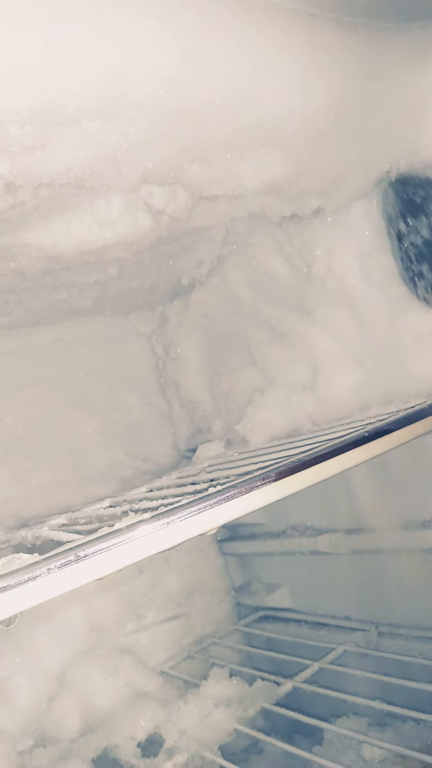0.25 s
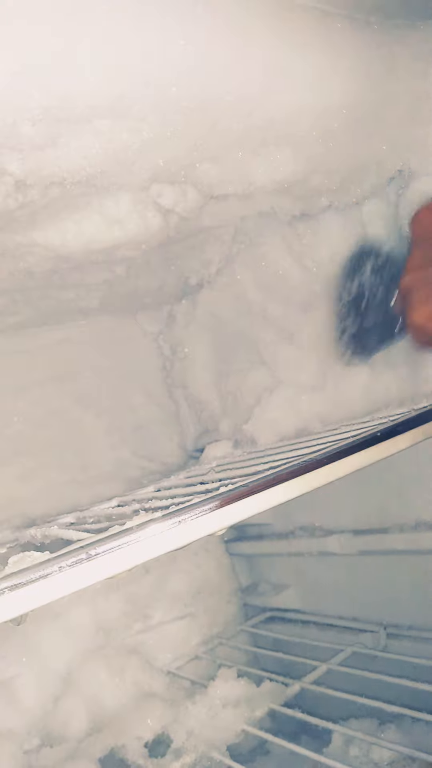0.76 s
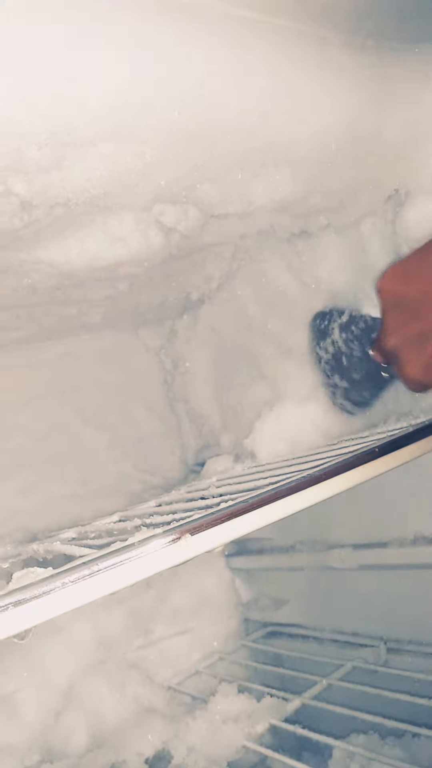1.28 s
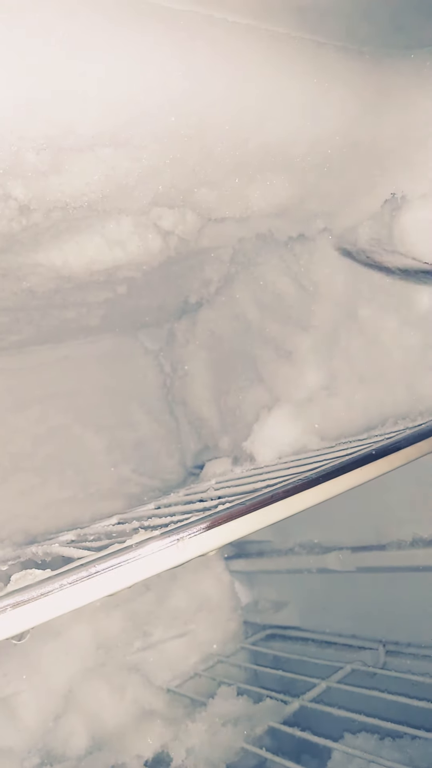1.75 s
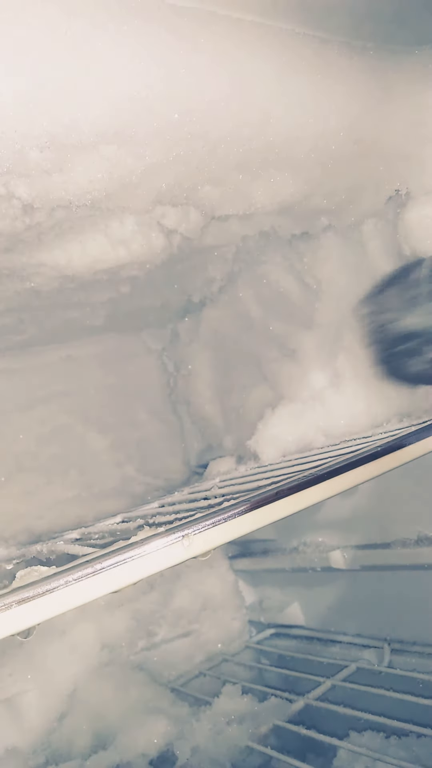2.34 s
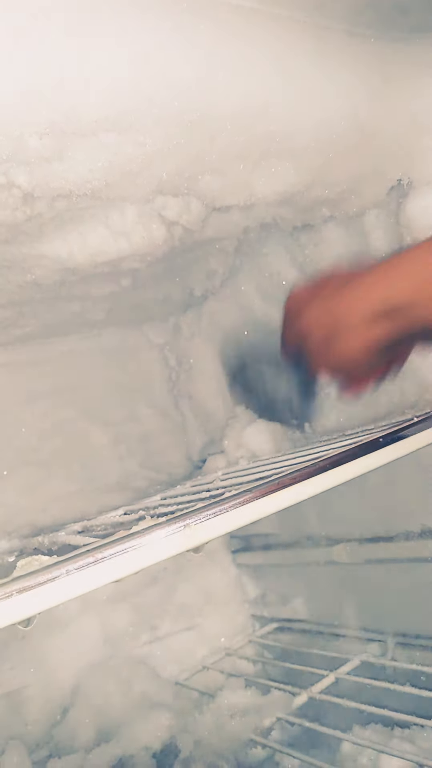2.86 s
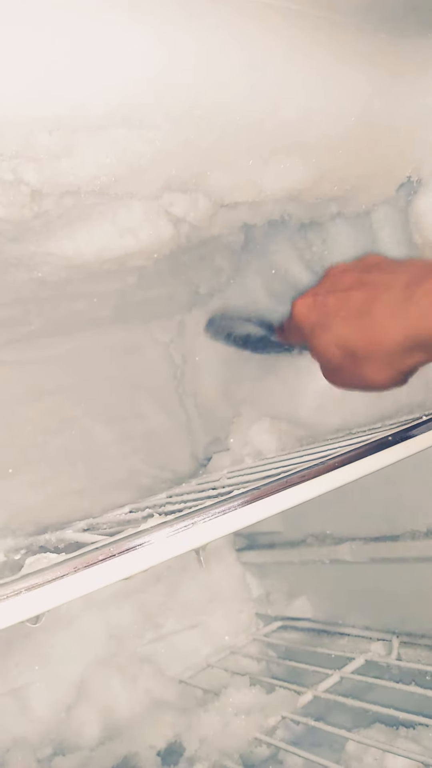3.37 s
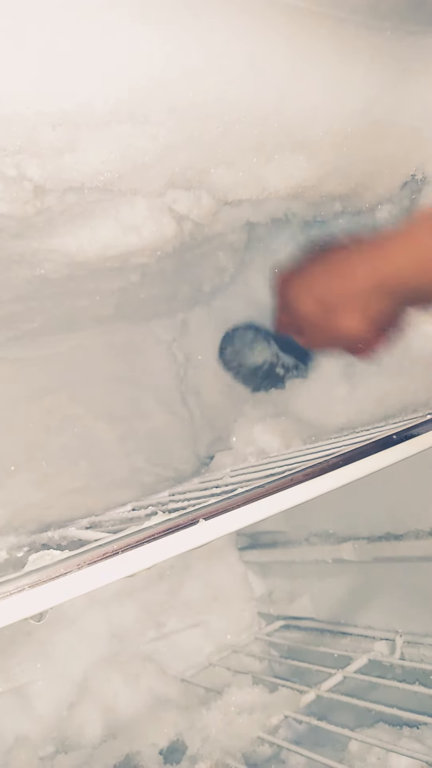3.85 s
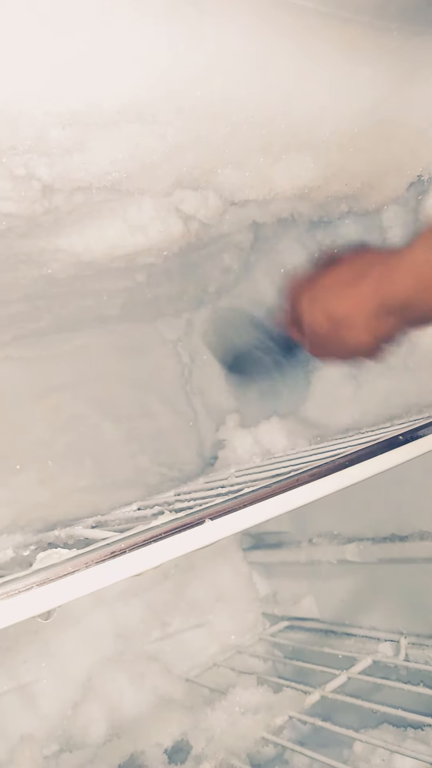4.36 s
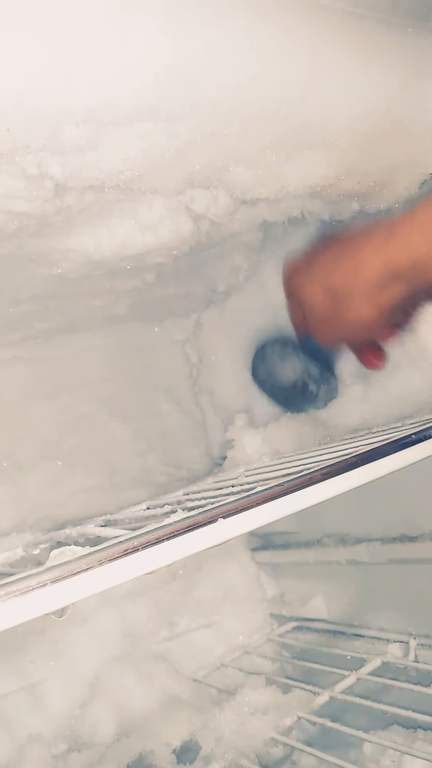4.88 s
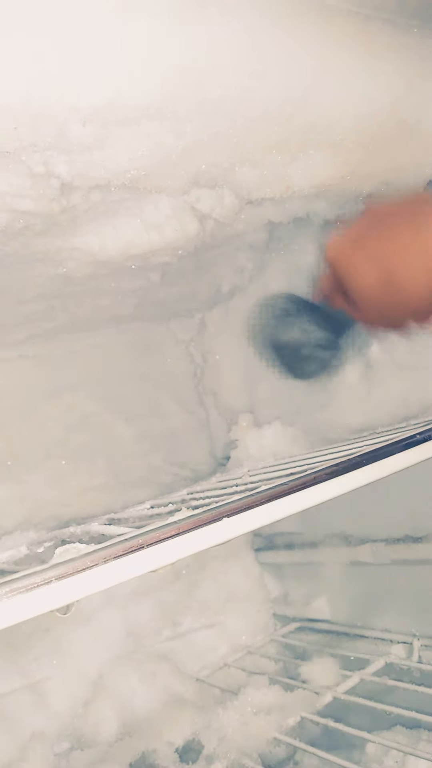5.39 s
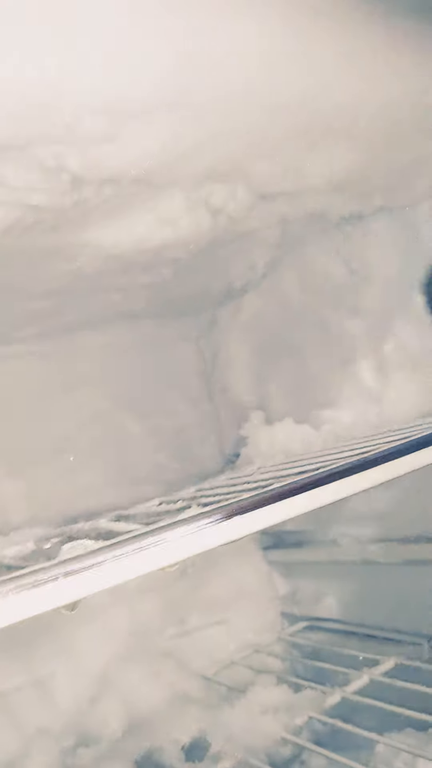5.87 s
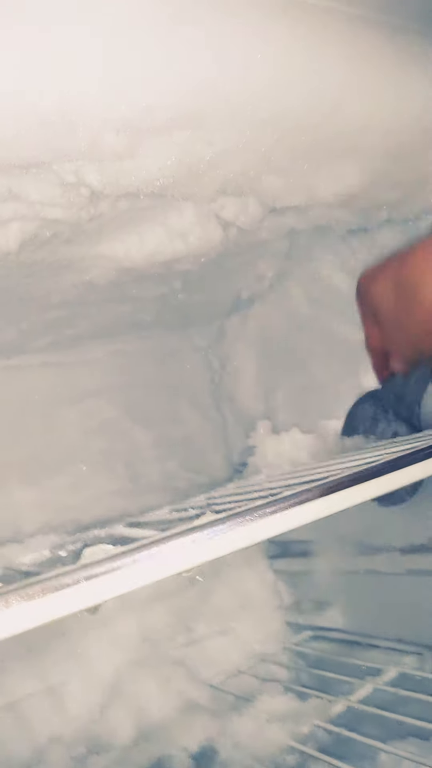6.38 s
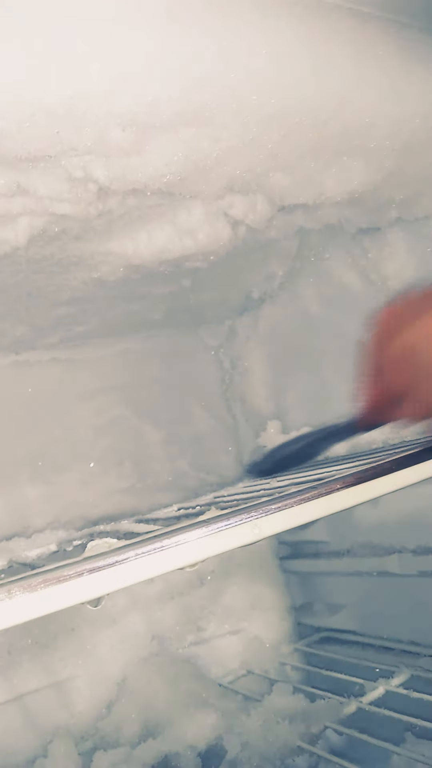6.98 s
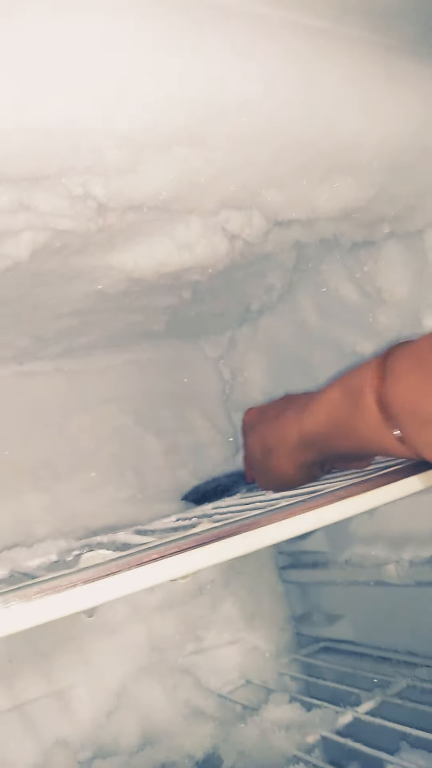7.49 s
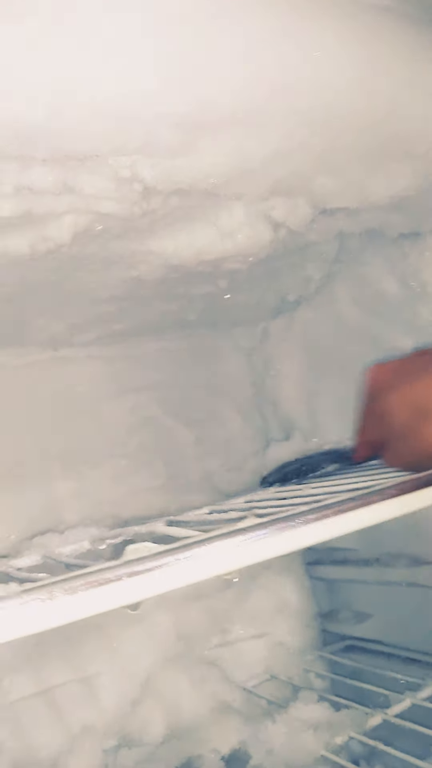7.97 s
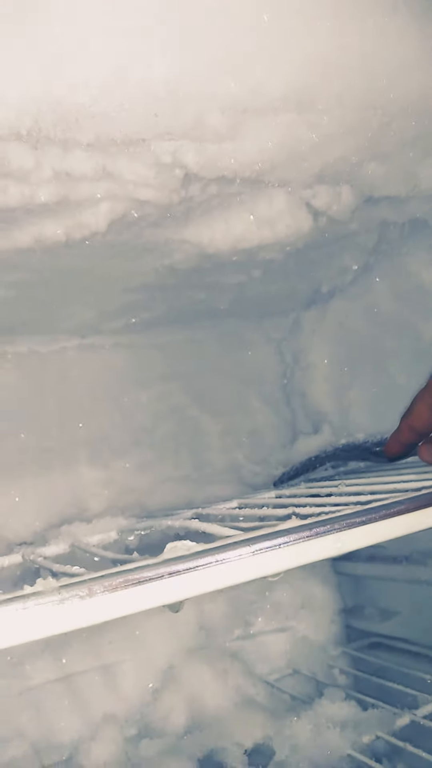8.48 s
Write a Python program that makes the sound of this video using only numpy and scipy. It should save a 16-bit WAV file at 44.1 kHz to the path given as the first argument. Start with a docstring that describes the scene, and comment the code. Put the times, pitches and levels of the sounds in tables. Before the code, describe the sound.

A hand scraper rasps thick frost from a freezer wall, then a scoop stabs it with crunchy thuds over a low motor hum.

```python
"""A flat scraper rasps thick frost from a freezer wall over a low hum, then a scoop scrapes and stabs at it.
Breaking ice is random snaps over powder noise, heard as hiss, as rattle of the tool and as boom of the liner.
Each stab is pulled back through loose frost, crumbs trickle after the work, and hard ticks mark chips and
short glancing stabs. At the end the scoop knocks along the wire shelf.
The small cabinet adds a brief, diffuse ring."""
import sys
import numpy as np
from scipy import signal
from scipy.fft import rfft, irfft, next_fast_len
from scipy.io import wavfile
from scipy.ndimage import uniform_filter1d, map_coordinates

SR = 44100
rng = np.random.default_rng(int(sys.argv[2]) if len(sys.argv) > 2 else 0)


def put_to_file(sound):
    """Save the sound as 16-bit audio at rate SR, in the file named by the first command-line argument."""
    columns = np.atleast_2d(sound).T  # one column per channel
    safe = np.clip(columns, -1, 1)
    whole_steps = np.round(safe * 32767)
    wavfile.write(sys.argv[1], SR, whole_steps.astype(np.int16))


N = 385409


def amp(db):
    """Decibels to gain."""
    return 10 ** (np.asarray(db) / 20)


def unit(x):
    """Scale to rms 1."""
    return x / np.sqrt(np.mean(x ** 2) + 1e-20)


def along(points, hz):
    """Read a list of (frequency, value) points on a log frequency axis."""
    f, v = np.transpose(points)
    return np.interp(np.log(hz + 1), np.log(f + 1), v)


def wobble(rate):
    """A smooth random curve with this many knots a second."""
    knots = rng.standard_normal(int(N * rate / SR) + 4)
    coarse = np.arange(0, N, 16)
    smooth = map_coordinates(knots, [coarse * rate / SR])
    return np.interp(np.arange(N), coarse, smooth)


def filtered(x, response):
    """Multiply the spectrum of x by a function of frequency."""
    m = next_fast_len(N + SR // 2)
    hz = np.fft.rfftfreq(m, 1 / SR)
    return irfft(rfft(x, m) * response(hz), m)[..., :N]


def ring(force, response):
    """Play a force through an impulse response."""
    return signal.oaconvolve(force, response)[:N]


def add(track, s, piece):
    """Mix a piece into a track at time s, in seconds."""
    part = track[..., max(round(s * SR), 0):][..., :piece.shape[-1]]
    part += piece[..., :part.shape[-1]]


# tones of the motor hum, against each other: (f/Hz, level/dB)
HUM_TONES = [(57, 1.5), (70, 1.5), (113, -12), (280, -11.5), (452, -29.5)]
# the hum swells and fades, before HUM_DB is added: (t/s, level/dB)
HUM_SWELL = [(0.1, -61), (1.35, -57.5), (2.16, -50), (3.63, -57.5), (4.57, -54), (5.42, -66), (6.49, -54),
             (8.6, -58)]
# colour of the dull room noise: (f/Hz, level/dB per Hz)
ROOM_COLOUR = [(18, -70), (30, -22), (55, -12), (81, -19), (113, -1.5), (151, -28.5), (367, -25.5),
               (420, -13), (535, -33), (639, -21), (1220, -17.5), (1360, -21), (2100, -20.5), (3020, -43.5),
               (6000, -64), (7800, -75.5), (13200, -120)]
# colour of the faint steady hiss: (f/Hz, level/dB per Hz)
HISS_COLOUR = [(3000, -29.5), (6400, -22), (7000, -1.5), (7600, 2.5), (8300, -21), (14000, -24)]
HUM_DB = -5


def background():
    """A motor hum of tones with wavering phase, over dull room noise and a thin hiss, both filtered noise."""
    t = np.arange(N) / SR
    hum = sum(amp(db) * unit(np.sin(2 * np.pi * hz * t + 0.8 * wobble(6.8))) for hz, db in HUM_TONES)
    hum_level = amp(HUM_DB + np.interp(t, *np.transpose(HUM_SWELL)))

    def noise(colour):
        return unit(filtered(rng.standard_normal(N), lambda hz: amp(along(colour, hz))))

    return hum_level * hum + amp(-56.5) * noise(ROOM_COLOUR) + amp(-70.5) * noise(HISS_COLOUR)


# how long the cabinet takes to fade by 60 dB: (f/Hz, fade time/s)
CABINET_FADE = [(100, 0.22), (400, 0.34), (1500, 0.24), (5000, 0.032), (13000, 0.27)]


def cabinet(x):
    """The frosted box answers with a short diffuse tail: noise that fades at its own pace at each frequency."""
    hz, t, z = signal.stft(rng.standard_normal(SR // 3), SR, nperseg=256)
    fade = amp(-60 * t / along(CABINET_FADE, hz)[:, None])
    tail = signal.istft(z * fade, SR, nperseg=256)[1]
    delayed = np.pad(tail, (SR // 300, 0))
    return ring(x, delayed / np.linalg.norm(tail))


def fractures(rate, spread_db, powder):
    """Force of rms 1 from breaking crystals: random snaps of uneven size over fine powder noise."""
    happens = rng.random(N) < rate / SR
    sign = rng.choice([-1, 1], N)
    size = amp(spread_db * np.clip(rng.standard_normal(N), -2, 2))
    return unit(unit(happens * sign * size) + powder * rng.standard_normal(N))


# the rasp of the edge, set by where it touches the wall: (t/s, f/Hz)
RASP = [(0.0, 2130), (0.15, 1800), (2.45, 1640), (2.69, 2000), (4.87, 1810), (5.33, 1520), (5.4, 2120),
        (6.77, 2010), (7.03, 1720), (7.13, 2390), (7.3, 1620), (7.6, 2380)]


def shifting(force, patchy_db, rasp_db=0, rasp_width_hz=300):
    """Every flake breaks with its own colour, and the edge favours its rasp frequency."""
    hz, t, z = signal.stft(force, SR, nperseg=512)
    field = uniform_filter1d(rng.standard_normal(z.shape), size=3, axis=0)
    field = uniform_filter1d(field, size=5, axis=1)
    flakes = unit(amp(patchy_db * unit(field)))
    offset_hz = hz[:, None] - np.interp(t, *np.transpose(RASP))
    rasp = 1 / (1 + (2 * offset_hz / rasp_width_hz) ** 2)
    # the constant cuts the rest while the rasp is lifted
    return signal.istft(z * flakes * amp(rasp_db * (rasp - 0.4722)), SR, nperseg=512)[1][:N]


# narrow peaks and dips in the rattle and crackle: (f/Hz, width/Hz, lift/dB)
NARROW_PEAKS = [(1352, 13.3, 5.5), (1630, 15, 8.5), (1944, 13, 0.5), (4545, 140, 7.5), (5886, 320, 6),
                (8100, 32, 5), (8300, 65, -2.5), (10600, 87, 5), (11130, 91, 6.5), (12570, 58, -4.5)]


def body(spectrum, size=2048):
    """Causal impulse response of energy 1 with this spectrum and the narrow peaks."""
    f = np.fft.rfftfreq(size, 1 / SR)
    peaks = sum(lift / (1 + (2 * (f - hz) / width) ** 2) for hz, width, lift in NARROW_PEAKS)
    cepstrum = irfft(np.log(amp(along(spectrum, f) + peaks) + 1e-6))
    # folding the cepstrum moves the energy to the start of the response
    cepstrum[1:size // 2] *= 2
    cepstrum[size // 2 + 1:] = 0
    h = irfft(np.exp(rfft(cepstrum)))
    return h / np.linalg.norm(h)


# the band that the frosted liner radiates
FROST_COAT = signal.butter(N=3, Wn=[90, 900], btype="band", fs=SR, output="sos")


def panel(modes, size=8192):
    """Impulse response of energy 1 of a resonant panel whose frost coat damps the treble."""
    f = np.fft.rfftfreq(size, 1 / SR)
    modal = sum(amp(db) * 1j * f * w / (c * c - f * f + 1j * f * w) for c, w, db in modes)
    h = signal.sosfilt(FROST_COAT, irfft(modal))
    return h / np.linalg.norm(h)


def crunch(drive, forces, liner, tool, ice):
    """Fractures shake the liner and the tool, and crackle in the air: three rows."""
    responses = (panel(liner), body(tool), body(ice))
    return np.array([ring(force, h) for force, h in zip(drive * forces, responses)])


# the liner's resonances under the scraper, the scoop and the shelf: (f/Hz, width/Hz, level/dB)
LINER_SCRAPER = [(109, 26, -4), (181, 150, -15.5), (311, 36, -3.5), (434, 23, 1.5), (580, 51, -14)]
LINER_SCOOP = [(114.7, 8, -9), (190.4, 97, -7.5), (309.8, 27.3, 7), (453, 34, 2.5), (568, 11, -14),
               (740, 39, -8)]
LINER_SHELF = [(190, 32, 0.5), (223, 41, 1.5), (292, 42, 5.5), (459, 25, 7), (598, 11, -21.5)]
# what the scraper, the scoop, the scoop moved down to the shelf and the knocked shelf radiate: (f/Hz, level/dB per Hz)
TOOL_SCRAPER = [(410, -20.5), (700, -30.5), (826, -17), (894, -5), (1040, -12), (1310, -3.5), (1570, -8),
                (2070, -3), (2940, -12), (3120, -29.5), (3400, -21.5), (4420, -65.5), (7480, -120)]
TOOL_SCOOP = [(410, -23), (700, -62), (763, -18.5), (831, -21.5), (949, 0), (1080, -9), (1160, 0),
              (1550, 1.5), (1690, -1), (1940, 4.5), (2110, 3.5), (2270, 1.5), (3400, -12), (4420, -49),
              (7480, -120)]
TOOL_SWEEP = [(410, -50), (700, -19), (1310, -11), (1780, 1), (1950, -0.5), (2170, 1), (3100, -12),
              (3400, -15), (4420, -17), (7480, -120)]
TOOL_SHELF = [(530, -144), (900, 7), (1190, 7), (1480, 1), (2270, 6), (2440, 19.5), (2710, 5), (2960, 8),
              (3400, -4), (4420, -114), (7480, -120)]
# what the ice radiates when scraped, scooped or struck by a brief tick: (f/Hz, level/dB per Hz)
ICE_SCRAPER = [(1900, -32), (3200, -10), (4200, -8), (5300, -8), (5850, -1), (6900, -3.5), (8200, 0.5),
               (10200, 4.5), (11800, -1), (13400, 3), (14400, -6)]
ICE_SCOOP = [(1900, -29.5), (3200, -12), (4000, -6.5), (4550, -3.5), (5250, -2), (5950, -1), (7000, -1),
             (9800, 6), (11000, 3), (12100, -1), (13400, 2), (14400, -1.5)]
ICE_TICK = [(1880, -21), (3200, -20.5), (4060, -17), (4500, -13), (6270, -5), (7340, -8), (7870, -1),
            (10000, 1.5), (14400, -9.5)]
# the scoop takes over from the scraper, and later moves down to the shelf
SWAP_S, SWEEP_S = 1.9, 6.05


def breaking(work, ticks, knocks, forces):
    """Liner, tool and ice sound of the breaking frost, each stage of the work with its own resonances."""
    t = np.arange(N) / SR
    scraper = work * (t < SWAP_S)
    scoop = work * (t >= SWAP_S) * (t < SWEEP_S)
    sweep = work * (t >= SWEEP_S)
    return (crunch(scraper, forces, LINER_SCRAPER, TOOL_SCRAPER, ICE_SCRAPER)
            + crunch(scoop, forces, LINER_SCOOP, TOOL_SCOOP, ICE_SCOOP)
            + crunch(sweep, forces, LINER_SHELF, TOOL_SWEEP, ICE_SCOOP)
            + crunch(ticks, forces, LINER_SCOOP, TOOL_SCOOP, ICE_TICK)
            + crunch(knocks, forces, LINER_SHELF, TOOL_SHELF, ICE_SCOOP))


def glancing(ice):
    """Crackle scattered by the near walls reaches left and right unalike: noise that follows its strength."""
    strength = np.sqrt(np.abs(uniform_filter1d(ice ** 2, size=64)))
    scatter = ring(strength * rng.standard_normal(N), body(ICE_SCOOP))
    treble = [(3500, -70), (4200, -11), (8000, 0)]  # (f/Hz, level/dB)
    return filtered(scatter, lambda hz: amp(along(treble, hz)))


# loosened crumbs against the work that freed them (liner, tool, ice); fading time of their power
TRICKLE_DB, TRICKLE_S = (-23, -25, -25.5), 0.13


def trickling(drive):
    """Work loosens crumbs, which keep falling for a moment afterwards."""
    keep = np.exp(-1 / (TRICKLE_S * SR))
    power = signal.lfilter([1 - keep], [1, -keep], drive ** 2)
    return amp(TRICKLE_DB)[:, None] * np.sqrt(power)


# brief hard ticks: chips snapping off and landing, and short glancing stabs of the scoop:
# (t/s, liner level/dB, tool level/dB, ice level/dB)
TICKS = [(1.408, -44, -31, -30.5), (1.563, -34.5, -28, -32.5), (1.608, -33, -35, -26),
         (1.734, -26.5, -67, -28), (1.804, -56, -25.5, -28), (1.828, -46, -27, -33), (1.992, -36, -38, -49),
         (2.1, -70, -54, -42.5), (2.245, -23, -24, -25), (2.307, -37, -25.5, -31.5),
         (2.898, -54, -26.5, -39), (2.958, -55, -25.5, -37), (3.235, -28.5, -18.5, -41.5),
         (3.984, -35, -23.5, -30), (4.592, -38, -24.5, -30.5), (4.797, -48, -20.5, -29),
         (5.411, -38, -34, -31), (5.437, -43, -23, -41), (5.473, -51, -23.5, -48), (5.74, -62, -61, -40),
         (5.852, -34, -32, -44), (5.896, -62.5, -28.5, -28), (6.467, -39, -26.5, -25.5)]
TICK_DECAY_S = .0035
TICK_CRUMBS_DB = 13  # ticks and knocks scatter more crumbs than a stroke of equal strength


def tapping(table, decay, gain_db):
    """Brief hard contacts: an instant rise and a fast fall, decay in seconds."""
    drive, t = np.zeros((3, N)), np.arange(SR // 20) / SR
    for s, *levels in table:
        add(drive, s, amp(np.array(levels) + gain_db)[:, None] * np.exp(-t / decay))
    return drive


def clinks(table, decay, gain_db):
    """A hard contact sets the tool ringing for a moment near its rasp frequency."""
    track, t = np.zeros(N), np.arange(SR // 12) / SR
    for s, _, db, _ in table:
        hz = np.interp(s, *np.transpose(RASP)) * (1 + 0.038 * rng.standard_normal())
        add(track, s, amp(db + gain_db) * np.sin(2 * np.pi * hz * t) * np.exp(-t / decay))
    return track


# the springy shelf strikes back once: delay; level against the knock (liner, tool, ice)
REBOUND_S, REBOUND_DB = .012, (-0.5, -9, -11)


def rebounding(table):
    """Each knock followed by its rebound."""
    rebounds = [(s + REBOUND_S, *np.add(levels, REBOUND_DB)) for s, *levels in table]
    return list(table) + rebounds


# how far the liner's resonances vary from spot to spot: level, and pitch as a fraction
SPOT_DB, SPOT_DETUNE = 3, .025


def thuds(modes, blows):
    """A rounded push on the liner per blow (s, duration s, dB), cushioned by frost; each spot rings its own way."""
    track = np.zeros(N)
    cushions = rng.uniform(0.00077, 0.0021, len(blows))  # s, longer under thicker frost
    spots = rng.standard_normal((len(blows), len(modes), 2))
    for (s, length, db), cushion_s, spot in zip(blows, cushions, spots):
        push = np.hanning(3 + int(abs(cushion_s) * SR))
        here = [(hz * (1 + SPOT_DETUNE * a), width, level + SPOT_DB * b)
                for (hz, width, level), (a, b) in zip(modes, spot)]
        thud = np.convolve(push / push.sum(), panel(here))
        add(track, s, amp(db) * np.sqrt(abs(length) * SR) * thud)
    return track


BITE_DB = -19.5  # first touch against full pressure
SAG_DB_PER_S, RELEASE_DB_PER_S = 28, 432.5  # easing off; the extra fall on lifting away


def pressure(length, swell, sag_db_per_s):
    """Envelope of one stroke: the edge bites, is pressed home, eases off and lifts away."""
    t = np.arange(SR // 3) / SR
    bite = BITE_DB * np.maximum(1 - t / swell, 0)
    sag = sag_db_per_s * np.maximum(t - swell, 0)
    release = RELEASE_DB_PER_S * np.maximum(t - length, 0)
    return amp(bite - sag - release) * np.minimum(t / .003, 1)


# the edge drawn across the frost:
# (t/s, length/s, time to full pressure/s, liner level/dB, tool level/dB, ice level/dB)
STROKES = [(-0.006, 0.058, 0.053, -25.5, -20.5, -32.5), (0.071, 0.089, 0.057, -26.5, -17.5, -24.5),
           (0.215, 0.059, 0.015, -37, -32.5, -36), (0.295, 0.093, 0.023, -52, -41.5, -44.5),
           (0.397, 0.17, 0.02, -29, -20, -25), (0.603, 0.15, 0.039, -46, -32.5, -34),
           (0.76, 0.11, 0.034, -26.5, -17, -25.5), (0.923, 0.17, 0.018, -51, -44, -49),
           (1.03, 0.024, 0.014, -37, -28, -34), (1.121, 0.13, 0.061, -23.5, -15.5, -24.5),
           (1.31, 0.058, 0.025, -51, -49, -54), (1.407, 0.11, 0.043, -70, -45, -40),
           (1.577, 0.066, 0.02, -46, -49, -50), (2.318, 0.075, 0.01, -61, -44, -52.5),
           (2.387, 0.068, 0.014, -35, -31, -40), (2.472, 0.18, 0.018, -35.5, -26.5, -35.5),
           (2.663, 0.092, 0.033, -49, -32, -44.5), (2.763, 0.075, 0.019, -38, -27.5, -39),
           (2.877, 0.13, 0.026, -61.5, -45.5, -49), (3.172, 0.073, 0.015, -41, -32.5, -44),
           (3.258, 0.026, 0.024, -29, -20, -35.5), (3.331, 0.08, 0.015, -43.5, -39, -44),
           (3.468, 0.013, 0.045, -52.5, -64, -38.5), (3.706, 0.031, 0.018, -61, -38, -41),
           (4.162, 0.01, 0.0093, -50, -30.5, -27.5), (4.35, 0.022, 0.017, -61, -36, -38.5),
           (4.957, 0.016, 0.014, -46.5, -32.5, -39.5), (5.13, 0.015, 0.016, -41.5, -21.5, -27.5),
           (5.338, 0.08, 0.029, -38, -34, -37.5), (5.584, 0.052, 0.031, -62.5, -52, -43.5),
           (5.926, 0.047, 0.012, -63, -41, -51), (6.084, 0.13, 0.02, -50.5, -31, -39),
           (6.187, 0.094, 0.043, -33.5, -23.5, -32), (6.299, 0.058, 0.043, -29.5, -22.5, -32),
           (7.015, 0.18, 0.036, -51, -47.5, -52), (7.258, 0.25, 0.024, -45.5, -45, -45.5),
           (7.823, 0.04, 0.012, -50, -64, -75), (8.088, 0.086, 0.023, -53, -55.5, -64)]
# the scoop knocking on the wire shelf: (t/s, liner level/dB, tool level/dB, ice level/dB)
KNOCKS = [(6.568, -23.5, -19.5, -29), (6.685, -25, -22, -32), (6.83, -27, -24.5, -27),
          (7.083, -31.5, -36, -30), (7.12, -38, -46, -25.5), (7.385, -36, -54, -30),
          (7.428, -40, -28.5, -45), (7.562, -52, -22.5, -25), (7.659, -49, -69, -41.5),
          (7.804, -45, -53, -37.5), (8.024, -59, -51, -42), (8.106, -45, -49, -42), (8.146, -49, -55, -48)]
# after a stab the tool is pulled back through the loose frost; levels against the stab (liner, tool, ice)
PULL_S, PULL_SAG_DB_PER_S, PULL_DB = 0.093, 75, (-21, -18, -20)
# before a blow lands the edge brushes the loose frost; levels against the blow (liner, tool, ice)
GRAZE_S, GRAZE_DB = 0.01, (-16, -21, -24.5)


def scraping():
    """Liner, tool and ice drive of the strokes, the graze before each stab or knock and the pull after each stab."""
    drive = np.zeros((3, N))
    for s, length, swell, *levels in STROKES:
        add(drive, s, amp(levels)[:, None] * pressure(length, swell, SAG_DB_PER_S))
    pull = pressure(PULL_S, 0.0037, PULL_SAG_DB_PER_S)
    graze = np.linspace(0, 1, int(GRAZE_S * SR))
    for s, length, *row in STABS:
        levels = stab_levels(*row)
        add(drive, s - GRAZE_S, amp(levels + GRAZE_DB)[:, None] * graze)
        add(drive, s + length, amp(levels + PULL_DB)[:, None] * pull)
    for s, *levels in KNOCKS:
        add(drive, s - GRAZE_S, amp(np.add(levels, GRAZE_DB))[:, None] * graze)
    return drive


def dragging(effort, slip_rate, slip_db, crumb_rate, crumb_share, yield_db):
    """Liner, tool and ice drive as the edge sticks and slips; under a light touch single crumbs stand out."""
    level_db = 20 * np.log10(effort + 1e-9)
    hand_db = 1.9 * wobble(45)
    slips = unit(amp(slip_db * wobble(slip_rate) + hand_db))
    falls = (rng.random(N) < crumb_rate / SR) * (0.12 + rng.random(N))
    crumbs = unit(ring(falls, np.exp(-np.arange(SR // 50) / SR / 0.0074)))
    # share of the crumbs, growing as the tool's drive weakens
    light = np.clip(crumb_share * np.clip((-37.5 - level_db[1]) / 12, 0, 1), 0, 1)
    drive = effort * np.sqrt((1 - light) * slips ** 2 + light * crumbs ** 2)
    # frost gives way at a set load, so the hardest pushes shear it evenly
    return drive / (1 + (drive[1] / amp(yield_db)) ** 4) ** (1 / 4)


STAB_ICE_DB = -3.5  # crackle of a stab against its rattle


def stab_levels(crunch_db, liner_db):
    """Liner, tool and ice dB of one stab."""
    return np.array([liner_db, crunch_db, crunch_db + STAB_ICE_DB])


# the tool driven into the frost: (t/s, time until it stops/s, crunch level/dB, liner level/dB)
STABS = [(1.003, 0.012, -26.5, -33), (2.147, 0.0066, -28, -32), (2.174, 0.015, -31.5, -40),
         (2.671, 0.016, -31, -24), (2.985, 0.025, -34, -31), (3.057, 0.0089, -24, -32),
         (3.108, 0.027, -27.5, -34), (3.286, 0.011, -28, -20.5), (3.412, 0.013, -19.5, -28),
         (3.438, 0.0086, -18.5, -21), (3.657, 0.012, -19, -21.5), (3.876, 0.016, -18.5, -24.5),
         (4.089, 0.0081, -16.5, -21.5), (4.293, 0.0113, -18.5, -22.5), (4.479, 0.023, -17, -25),
         (4.66, 0.043, -19, -25.5), (4.857, 0.044, -18.5, -21.5), (5.069, 0.0051, -16.5, -21),
         (5.201, 0.0098, -27, -22.5), (5.305, 0.021, -17.5, -27), (5.513, 0.013, -22, -31.5),
         (5.532, 0.0091, -19, -26.5), (5.788, 0.0052, -27.5, -24.5), (6.399, 0.011, -33, -22),
         (6.487, 0.012, -32, -36.5), (6.601, 0.015, -43.5, -28.5)]


def stabbing(rise, stop, lead, liner_db):
    """Stabs crush frost until the tool stops; gentle ones bite more slowly, and the liner feels the push first."""
    drive, t = np.zeros((3, N)), np.arange(SR // 8) / SR
    for s, length, *row in STABS:
        levels = stab_levels(*row)
        bite = rise * amp(-.4 * (levels[2] + 14.5))
        shape = (1 - np.exp(-t / bite)) ** 2 * np.exp(-np.maximum(t - length - bite, 0) / stop)
        for track, db, early in zip(drive, np.add(levels, (liner_db, 0, 0)), (lead, 0, 0)):
            add(track, s - early - bite / 2, amp(db) * shape)
    return drive


def scene():
    """Both tools at work in the cabinet; only the crackle of the ice spreads left and right."""
    lumps = fractures(rate=1800, spread_db=2.5, powder=0.64)
    crystals = fractures(rate=2600, spread_db=1.5, powder=0.94)
    tool_force = shifting(lumps, patchy_db=4.0, rasp_db=7.0, rasp_width_hz=314)
    forces = np.array([lumps, tool_force, shifting(crystals, patchy_db=3.5)])

    contacts = rebounding(KNOCKS)
    stabs = stabbing(rise=0.00072, stop=0.0023, lead=0.0034, liner_db=-4.0)
    ticks = tapping(TICKS, decay=TICK_DECAY_S, gain_db=-1.0)
    knocks = tapping(contacts, decay=0.0055, gain_db=-5.0)
    strokes = scraping()
    crumbs = trickling(strokes + stabs + amp(TICK_CRUMBS_DB) * (ticks + knocks))
    drag = dragging(np.hypot(strokes, crumbs), slip_rate=220, slip_db=2.0,
                    crumb_rate=75, crumb_share=0.32, yield_db=-17.0)
    liner, tool, ice = breaking(np.hypot(drag, stabs), ticks, knocks, forces)

    # a stab thumps the liner as it lands, then with its full weight as it comes to rest
    landing = thuds(LINER_SCOOP, [(s - .005, length, db) for s, length, _, db in STABS])
    resting = thuds(LINER_SCOOP, [(s + .65 * length, length, db) for s, length, _, db in STABS])
    shelf = thuds(LINER_SHELF, [(s + 0.00195, .004, db) for s, db, _, _ in contacts])
    liner = liner + amp(-14) * landing + amp(-1.5) * resting + amp(-2.5) * shelf
    tool = tool + clinks(contacts, decay=0.0058, gain_db=1) + clinks(TICKS, decay=0.0065, gain_db=-4.5)

    direct = amp(-2.0) * liner + amp(-1.22) * tool + amp(3.5) * ice
    echo = cabinet(amp(-10.0) * liner + amp(-11) * tool + amp(-13) * ice)
    mid = direct + echo + background()
    side = amp(-6.3) * glancing(ice)
    return np.array([mid + side, mid - side])


TOP_HZ = 14400


def record(dry):
    """A very steep low-pass keeps next to nothing above the top frequency."""
    return filtered(dry, lambda hz: 1 / np.sqrt(1 + (np.minimum(hz / TOP_HZ, 2)) ** 440))


dry = scene()
out = record(dry)
put_to_file(out)
```